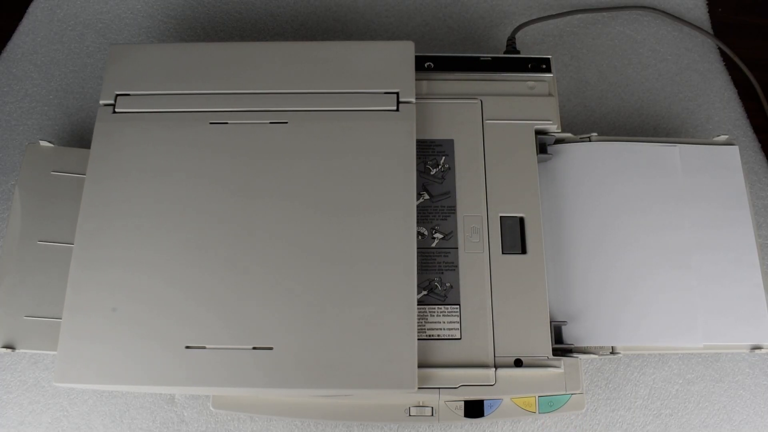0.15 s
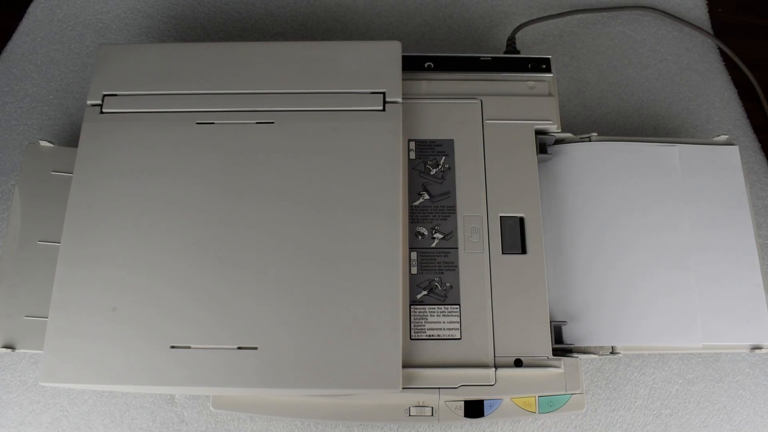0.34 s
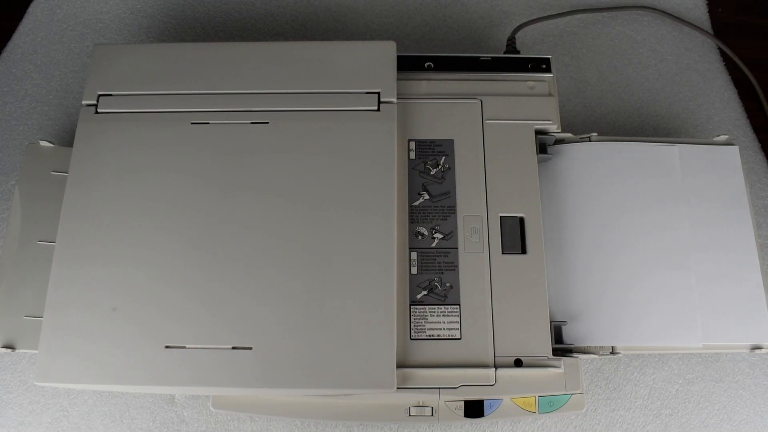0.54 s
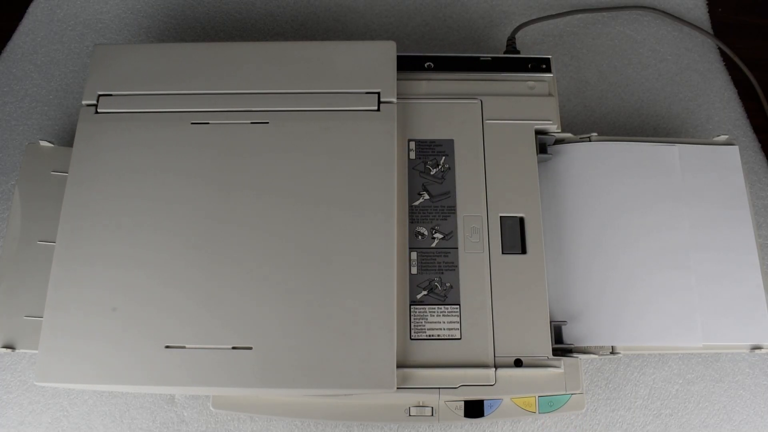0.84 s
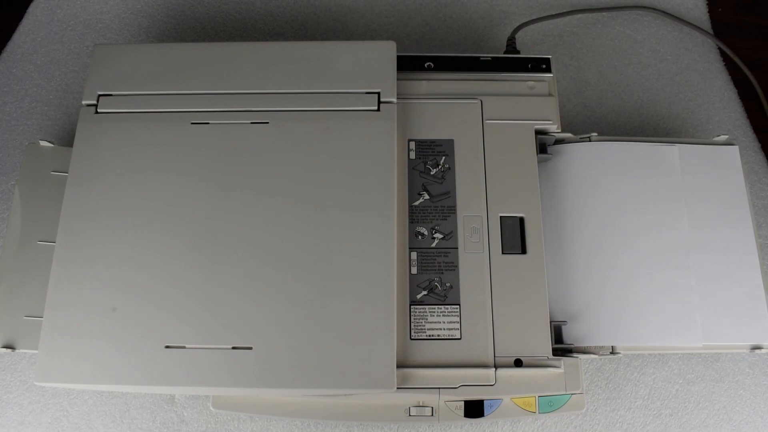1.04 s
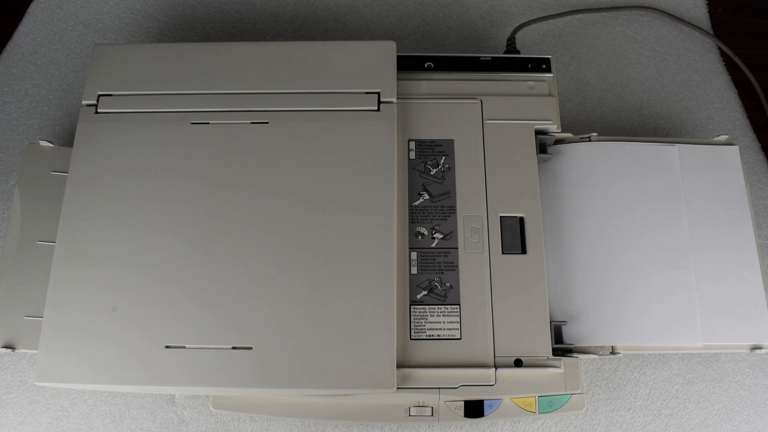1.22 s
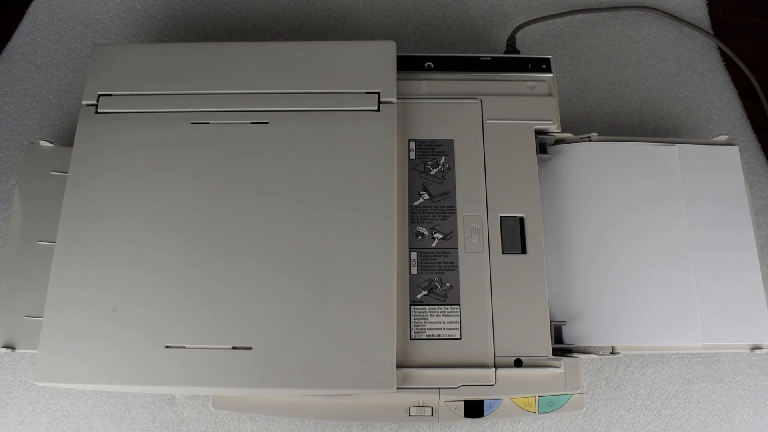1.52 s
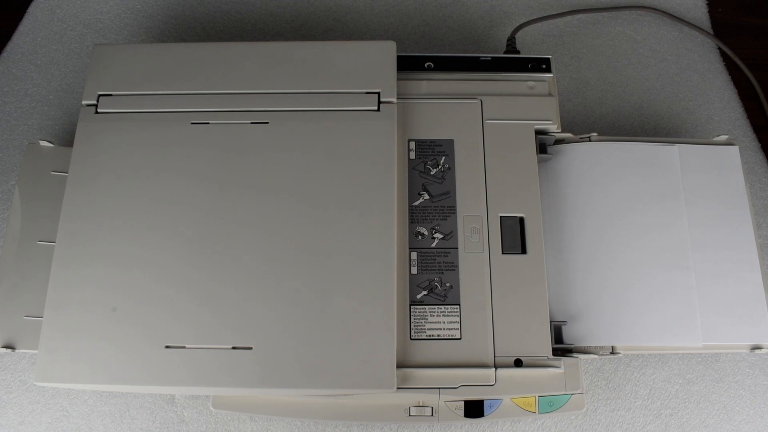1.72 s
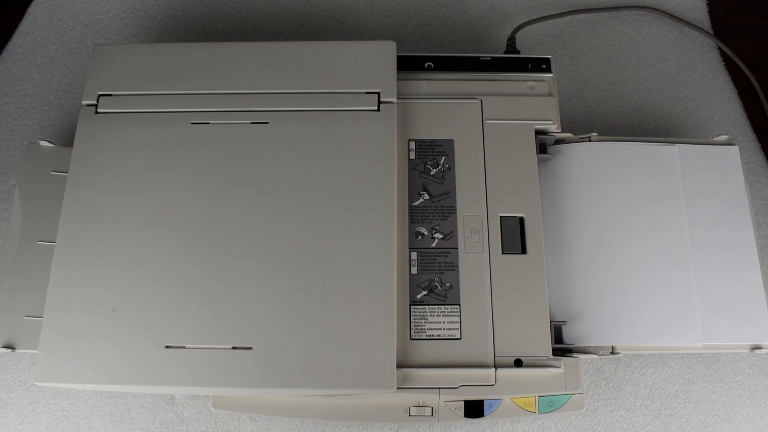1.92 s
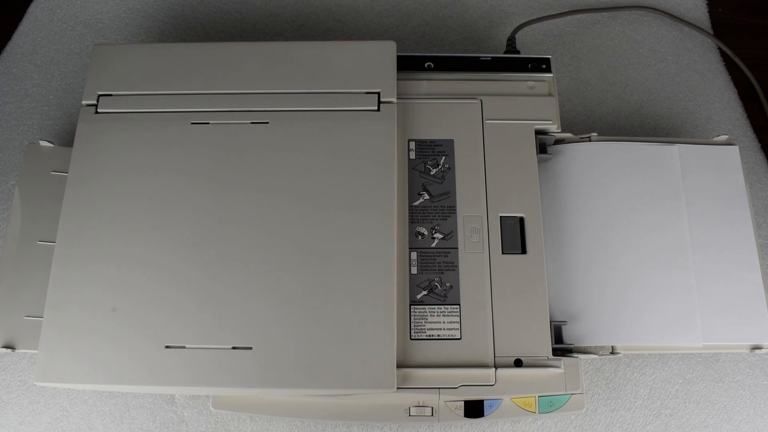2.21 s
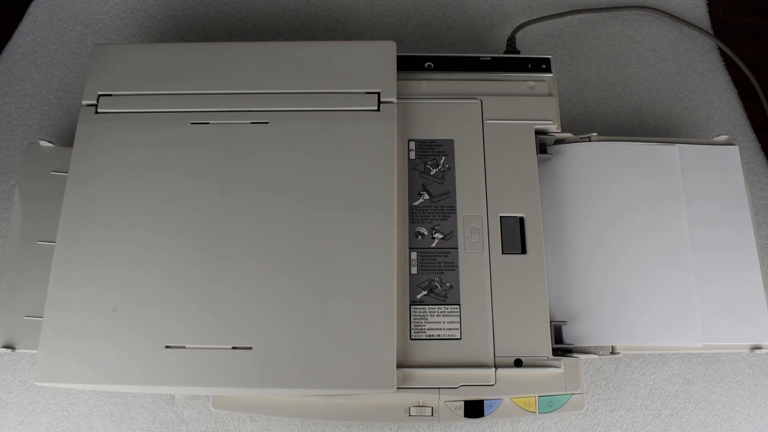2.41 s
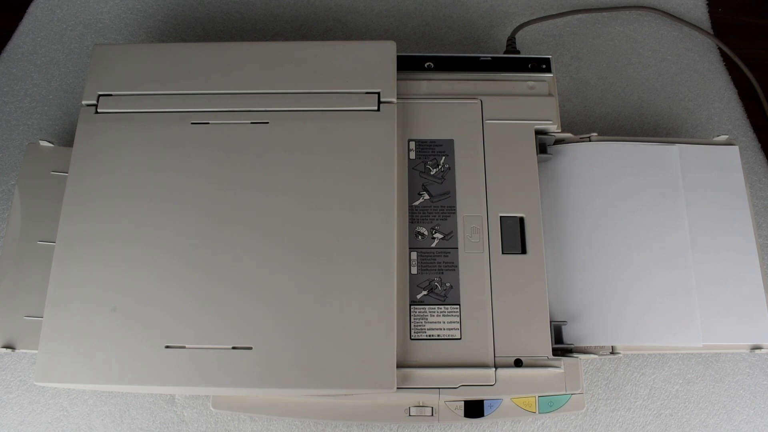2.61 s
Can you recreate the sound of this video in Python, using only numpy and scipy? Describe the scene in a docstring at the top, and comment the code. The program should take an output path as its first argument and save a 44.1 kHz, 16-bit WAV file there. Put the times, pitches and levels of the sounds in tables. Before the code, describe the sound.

A desktop copier's sliding plastic lid clatters close by: hollow knocks and short gritty scrapes from about 0.06 s, strong blows near 0.2, 0.28 and a brighter one at 0.36, lighter ticks around 0.44, then the loudest clack at 0.66. A quieter motor runs throughout, and alone afterwards until about 2.5 s: airy fan noise, low rumble, steady gear whine and rapid fine clatter. Small dry room.

```python
"""A sliding lid knocks and scrapes into place on a desktop copier heard from close above; then only the drive runs.
Lid blows and runs of grit excite casing modes and a dense rattle, with a short diffuse room tail.
A 15-tooth pinion whines in sines at multiples of its shaft rate and clatters in clicks that repeat each turn.
A second gear pair sings in steady sines; fan air and motor rumble are filtered noise, with a rub once per idler turn."""
import sys
import numpy as np
from scipy import signal
from scipy.fft import rfft, irfft
from scipy.io import wavfile
from scipy.ndimage import uniform_filter1d

SR = 44100
rng = np.random.default_rng(int(sys.argv[2]) if len(sys.argv) > 2 else 0)


def nominal_scale(level):
    """Amplitude ratio for a level in decibels (scalar or array-like)."""
    x = np.asarray(level, float) / 20
    return 10 ** x


def waveform_to_disk(signal):
    """Save audio, clipped to [-1, 1], as 16-bit WAV at the path in sys.argv[1]."""
    frames = np.transpose(np.atleast_2d(signal))
    scaled = np.clip(frames, -1, 1) * 32767
    samples = np.round(scaled).astype(np.int16)
    wavfile.write(sys.argv[1], SR, samples)


N = 121275

# Spectrum of the air and motor noise. Each row: frequency in Hz, relative density in dB.
AIR_SPECTRUM = [(20, -50), (40, -28), (62, -7.5), (130, -6), (185, -15), (270, -12.5), (420, -8.5),
                (700, -7.5), (1100, -8.5), (1500, -15.5), (2600, -17), (3100, -19), (5100, -25),
                (5900, -25), (6500, -33.5), (9500, -36.5), (13000, -45.5), (15700, -52)]
AIR_DB, FLICKER_DB = -42, .6  # rms of the whole; spread of each band's flicker

# Resonances excited by fan and motor noise. Each row: frequency in Hz, width in Hz, rms level in dB.
RUMBLE_RESONANCES = [(82.6, 35, -51.5), (113.5, 22.3, -45.5), (145.6, 22.7, -48.5), (223.5, 22.2, -53.5),
                     (1065, 80, -55.5), (2155, 110, -56.5), (2630, 170, -54)]

# The rub, once per turn of the idler gear
IDLER_HZ = 9.89
RUB_HZ, RUB_WIDTH_HZ, RUB_DB, RUB_WAVER_DB = 8180, 400, -72, 1.5
RUB_AT_S, RUB_SHARP = .041, 1.5  # time of a peak; how narrow each swell is

# Steady tones of the second gear pair and the supply. Each entry: frequency in Hz.
TONE_HZ = [118.4, 558.5, 817.65, 1635.3, 14676, 14856.6, 15037]
# Levels of those tones. Each entry: rms level in dB, before waver and swing.
TONE_DB = [-56, -52.5, -40.5, -56.5, -79, -91, -95]
# Pinion whine partials. Each entry: multiple of the shaft rate.
WHINE_ORDERS = [14, 15, 17, 24, 29, 30, 31, 35, 48, 60, 74, 75, 76, 106, 113, 127, 149, 151, 153, 154, 155,
                156, 157, 158, 159, 251, 254]
# Levels of those partials. Each entry: rms level in dB, before waver and swing.
WHINE_DB = [-61, -43, -58, -57, -53, -49, -57, -62, -67, -61, -64, -57, -63, -69, -71, -72, -75, -68, -63.5,
            -71, -69, -62, -70, -67, -71, -80, -70.5]
TONE_WAVER_DB, WHINE_WAVER_DB = .8, 1.4
IDLER_WOBBLE = .09  # swing of the tones, as a fraction of amplitude

SHAFT_HZ, TEETH = 36.124, 15
# What the tooth clicks ring. Each row: frequency in Hz, width in Hz, rms level in dB.
HOUSING_RESONANCES = [(900, 500, -54), (2160, 400, -64), (2700, 500, -65), (5620, 900, -69),
                      (9180, 500, -78), (3800, 500, -64), (4600, 600, -67), (6600, 900, -76),
                      (7700, 700, -76), (10350, 200, -83)]
TOOTH_SPREAD_DB, CLICK_SCATTER_DB = 6, 1.8  # from tooth to tooth; from click to click

# Casing modes. Each row: frequency in Hz, relative level in dB, t60 in seconds before the length factor.
CASING_MODES = [(334, 3.5, 0.16), (461, -1.5, 0.05), (609, 0, 0.08), (697, 2.5, 0.091), (791, -2, 0.093),
                (1097, -4, 0.067), (1261, 6.5, 0.032), (1520, -1, 0.047), (1780, -9.5, 0.13),
                (2250, 3, 0.023), (2880, -17, 0.075), (4246, -13, 0.11), (5170, -14, 0.11),
                (5360, -3, 0.035), (5800, -5, 0.026), (7250, -35, 0.027)]
RATTLE_DB = 11  # dense ringing against the modes
RATTLE_T60_S, RATTLE_SLOPE = 0.13, -0.88  # t60 at 1 kHz before the length factor; its power law
CRACK_DB, RISE_S = 16.5, 0.00037  # bare first contact; how fast the ringing builds
LID_LOW_HZ = 268  # too small a panel to sound below this
LID_TOP_HZ = 11000  # above this the plastic sounds ever weaker

# Lid knocks. Each row: start in seconds, rms level in dB over the first 6 ms, centre in Hz,
# spread in octaves, ring length as a factor.
KNOCKS = [(0.079, -24, 1630, 0.78, 0.62), (0.1194, -28, 1440, 0.89, 1), (0.131, -34, 1030, 0.88, 0.52),
          (0.1936, -18.5, 2080, 0.89, 0.66), (.213, -32, 1400, 0.99, 0.67), (.245, -34.5, 760, 0.57, 1),
          (.268, -39, 8000, 1.5, .5), (.282, -19.5, 1710, 1.15, 0.79), (0.317, -31.5, 1000, 1, 0.84),
          (0.3583, -15, 5860, 1, 0.71), (.4315, -36, 4940, 0.88, 0.97), (.442, -31, 9000, 1.1, 0.6),
          (.452, -33, 3900, 1.1, 0.91), (.5805, -29.5, 1350, 0.77, 0.55), (0.6636, -19.5, 2700, 1.16, 1),
          (.666, -12, 1400, 1.25, 0.93)]
# Lid scrapes. Each row: start in seconds, length in seconds, rms level in dB, centre in Hz, spread in octaves.
SCRAPES = [(0.059, .016, -33.5, 1700, 0.73), (0.169, .006, -59, 10500, .4), (0.227, 0.02, -30, 1120, 1.38),
           (0.268, 0.025, -26.5, 2140, 1.51), (.432, 0.038, -31, 1310, 1.9),
           (0.656, 0.016, -28.5, 1480, 0.96)]
GRIT_DB, SCRAPE_RING = 2.5, .4  # unevenness of the grit; ring length factor

ROOM_DB, ROOM_T60_S, ROOM_TOP_HZ = -21, .24, 4500
STEADY_TOP_HZ = 15740  # the steady sound is cut off above this

# Stereo width. Each row: frequency in Hz, side under mid in dB.
WIDTH = [(60, -88), (200, -16.5), (700, -33), (2400, -17.5), (8000, -14), (15000, -2.5)]
LID_WIDTH_DB = -4  # the lid is heard more central than the drive
LEFT_DB, SMEAR_S = -.3, .015  # left against right; decay constant of the side's smear


def level(x, db):
    """Scale to an rms level."""
    return x * nominal_scale(db) / np.sqrt(np.mean(x ** 2))


def shape(x, gain):
    """Filter by a gain given as a function of Hz."""
    hz = np.fft.rfftfreq(x.shape[-1], 1 / SR) + 1  # keeps clear of 0 Hz
    return irfft(rfft(x) * gain(hz), x.shape[-1])


def curve(points):
    """Gain from (Hz, dB) points joined on a log-frequency axis."""
    hz, db = np.array(points, float).T
    return lambda f: nominal_scale(np.interp(np.log(f), np.log(hz), db))


def ring(x, hz, width_hz):
    """One resonance."""
    return signal.lfilter(*signal.iirpeak(hz, hz / width_hz, SR), x)


def ring_twice(x, hz, width_hz):
    """The same resonance run twice, for steeper skirts."""
    return ring(ring(x, hz, width_hz), hz, width_hz)


def walk(rate):
    """Random levels held 1 / rate s and slewed twice; mean 0, spread 1."""
    hold = int(SR / rate)
    steps = np.repeat(rng.standard_normal(N // hold + 1), hold)
    slewed = uniform_filter1d(uniform_filter1d(steps, hold), hold)[:N]
    return (slewed - slewed.mean()) / slewed.std()


def room(x):
    """A short diffuse tail: decaying noise after a 4 ms gap, with the treble rolled off."""
    u = np.arange(SR // 2) / SR
    tail = rng.standard_normal(len(u)) * np.exp(-np.log(1000) * u / ROOM_T60_S) * (u > .004)
    wet = signal.fftconvolve(x, tail / np.sqrt(np.sum(tail ** 2)))[:N]
    return shape(wet, lambda f: 1 / (1 + (f / ROOM_TOP_HZ) ** 2))


def air():
    """Fan and motor noise whose overlapping octave bands flicker independently."""
    base = shape(rng.standard_normal(N), curve(AIR_SPECTRUM))
    bands = np.zeros(N)
    for octave in range(4, 15):  # centres at 2 ** octave Hz
        flicker = nominal_scale(FLICKER_DB * walk(14))
        window = lambda f: np.cos(np.pi / 2 * (np.log2(f) - octave).clip(-1, 1)) ** 2
        bands += flicker * shape(base, window)
    return level(bands, AIR_DB)


def rumble():
    """Fan and motor noise exciting resonances of the machine."""
    return sum(level(ring_twice(rng.standard_normal(N), hz, width), db) for hz, width, db in RUMBLE_RESONANCES)


def idler_rub(t):
    """A narrow band of noise swelling once per idler turn, each swell of wavering strength."""
    swell = np.exp(RUB_SHARP * np.cos(2 * np.pi * IDLER_HZ * (t - RUB_AT_S)))
    swell = swell * nominal_scale(RUB_WAVER_DB * walk(6.4))
    return level(swell * ring_twice(rng.standard_normal(N), RUB_HZ, RUB_WIDTH_HZ), RUB_DB)


def sines(t, hz, db, waver_db):
    """Steady tones whose levels waver one by one and swing together with the idler gear."""
    swing = 1 + IDLER_WOBBLE * np.cos(2 * np.pi * IDLER_HZ * (t - RUB_AT_S))
    total = np.zeros(N)
    for f, d in zip(hz, db):
        peak = np.sqrt(2) * nominal_scale(d + waver_db * walk(9.49))
        total += peak * np.sin(2 * np.pi * (f * t + rng.random()))
    return swing * total


def gear_song(t):
    """Tones of the second gear pair and the supply, at fixed frequencies."""
    return sines(t, TONE_HZ, TONE_DB, TONE_WAVER_DB)


def pinion_whine(t):
    """The pinion's whine, locked to whole multiples of its shaft rate."""
    return sines(t, SHAFT_HZ * np.array(WHINE_ORDERS), WHINE_DB, WHINE_WAVER_DB)


def clatter():
    """Each tooth clicks with its own strength and place, nearly the same on every turn, and rings the housing."""
    own = rng.standard_normal((TEETH, 2))
    tooth_hz = SHAFT_HZ * TEETH
    k = np.arange(int(N / SR * tooth_hz) - 2)
    offset = .3 * own[k % TEETH, 0].clip(-2, 2)  # in tooth spacings
    at = (k + 1 + offset) / tooth_hz * SR
    size = nominal_scale(TOOTH_SPREAD_DB * own[k % TEETH, 1] + CLICK_SCATTER_DB * rng.standard_normal(len(k)))
    # a click between two samples is shared by both
    first, part = at.astype(int), at % 1
    clicks = np.bincount(first, size * (1 - part), N) + np.bincount(first + 1, size * part, N)
    return sum(level(ring_twice(clicks, hz, width), db) for hz, width, db in HOUSING_RESONANCES)


def casing(push, hz, octaves, length):
    """The casing's answer to a push: first contact, modes and dense rattle, coloured by where it is struck."""
    u = np.arange(8192) / SR
    fall = lambda t60: np.exp(-np.log(1000) * u / (t60 * length))
    modes = sum(nominal_scale(db) * fall(t60) * np.sin(2 * np.pi * (f * u + rng.random())) for f, db, t60 in CASING_MODES)
    rattle = np.zeros(len(u))
    for f in 250 * 2. ** np.arange(7):  # octave bands, in Hz
        t60 = RATTLE_T60_S * (f / 1000) ** RATTLE_SLOPE
        rattle += fall(t60) * ring(rng.standard_normal(len(u)), f, f * 0.48)
    ringing = (modes + nominal_scale(RATTLE_DB) * rattle) * (1 - np.exp(-u / RISE_S))
    crack = nominal_scale(CRACK_DB) * (u == 0)

    def colour(f):
        """A bell around the centre, within the range the lid can radiate."""
        bell = np.exp(-(np.log2(f / hz) / octaves) ** 2 / 2)
        return bell / np.sqrt(1 + (f / LID_TOP_HZ) ** 4) / (1 + (LID_LOW_HZ / f) ** 4)

    return shape(signal.fftconvolve(push, ringing + crack), colour)


def place(y, start_s, lead):
    """Lay a sound on the timeline so that its push, lead samples in, falls on start_s."""
    return np.pad(y, (int(start_s * SR) - lead, N))[:N]


def lid():
    """Knocks are single blows on the casing, scrapes are runs of grit."""
    out, pad = np.zeros(N), np.zeros(256)  # silence ahead leaves the colour filter room
    lead = len(pad)
    for start, db, hz, octaves, length in KNOCKS:
        y = casing(np.r_[pad, 1.], hz, octaves, length)
        onset = y[lead:lead + int(.006 * SR)]
        out += place(y * nominal_scale(db) / np.std(onset), start, lead)
    for start, long, db, hz, octaves in SCRAPES:
        count = int(long * SR)
        grit = rng.standard_normal(count) * nominal_scale(GRIT_DB * rng.exponential(size=count))
        stroke = np.sin(np.pi * (.25 + .65 * np.arange(count) / count))  # swells, then eases off
        y = casing(np.r_[pad, grit * stroke], hz, octaves, SCRAPE_RING)
        out += place(y * nominal_scale(db) / np.std(y[lead:lead + count]), start, lead)
    return out


def stereo(hits, drive):
    """Left and right as mid plus and minus a side smeared by decaying noise."""
    mid = hits + drive
    u = np.arange(3000)
    smear = rng.standard_normal(len(u)) * np.exp(-u / SR / SMEAR_S)
    smear = smear / np.sqrt(np.sum(smear ** 2))
    side = signal.fftconvolve(nominal_scale(LID_WIDTH_DB) * hits + drive, smear)[:N]
    side = shape(side, curve(WIDTH))
    return np.array([(mid + side) * nominal_scale(LEFT_DB / 2), (mid - side) * nominal_scale(-LEFT_DB / 2)])


def scene():
    """The running drive throughout, and the lid with its room tail, spread to stereo."""
    t = np.arange(N) / SR
    drive = air() + rumble() + idler_rub(t) + gear_song(t) + pinion_whine(t) + clatter()
    drive = shape(drive, lambda f: 1. * (f < STEADY_TOP_HZ))
    hits = lid()
    hits = hits + nominal_scale(ROOM_DB) * room(hits)
    return stereo(hits, drive)


def roll_off(x):
    """The treble ends steeply here."""
    return signal.sosfilt(signal.butter(12, 16830, fs=SR, output="sos"), x)


def record(dry):
    """The finished mix, as it is delivered."""
    return roll_off(dry)


dry = scene()
out = record(dry)
waveform_to_disk(out)
```